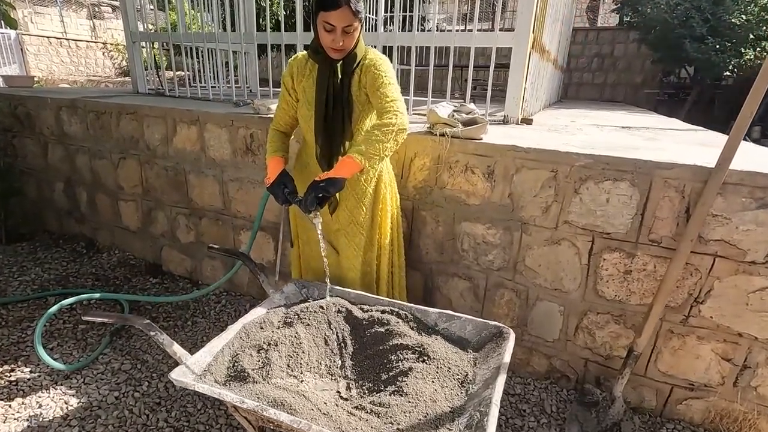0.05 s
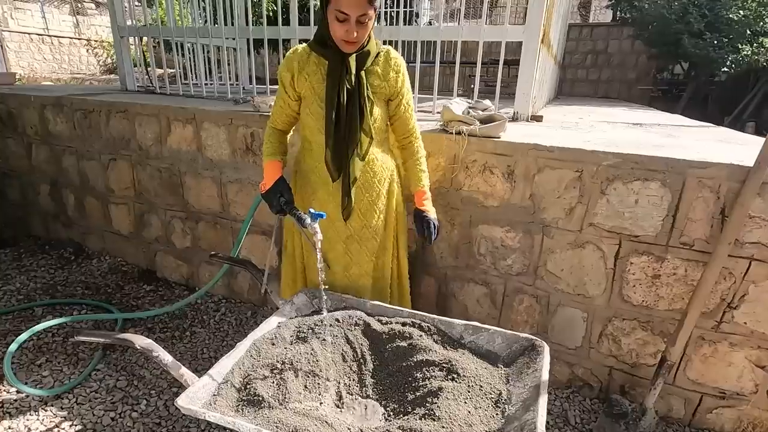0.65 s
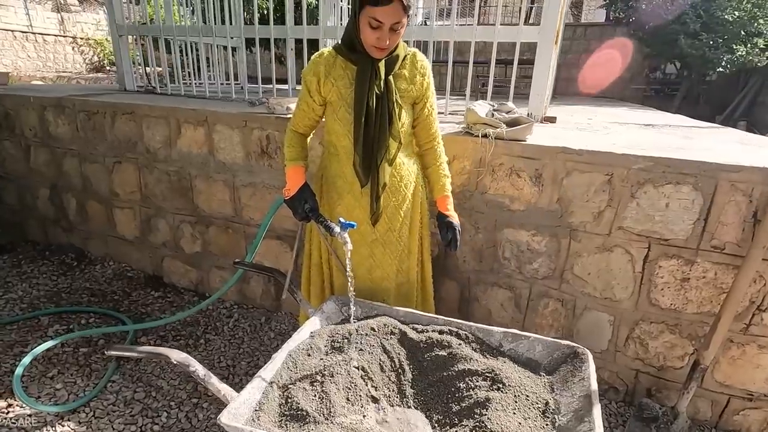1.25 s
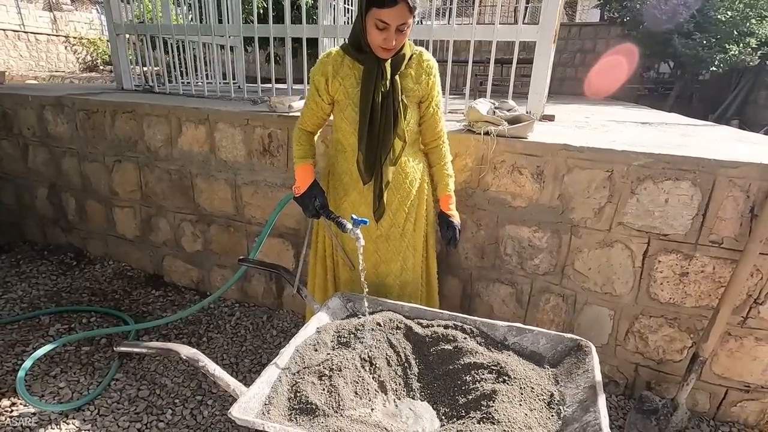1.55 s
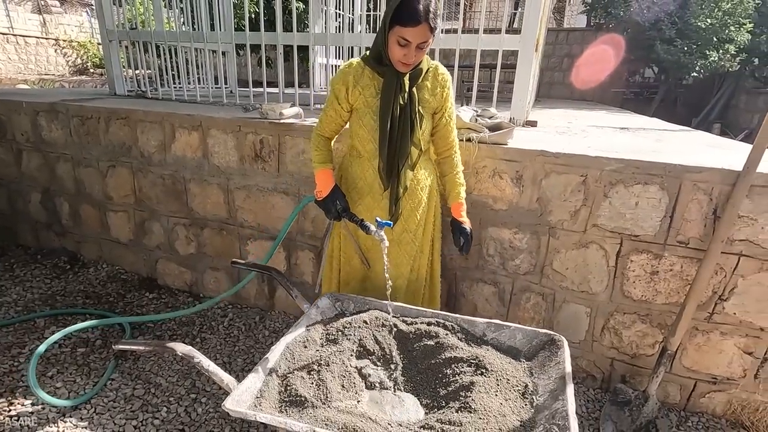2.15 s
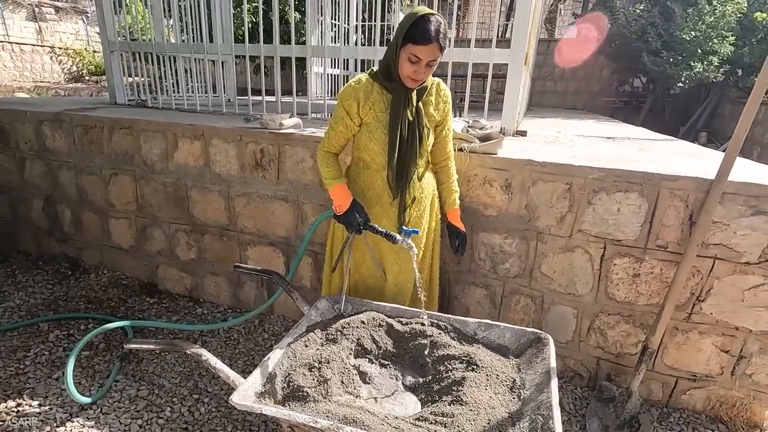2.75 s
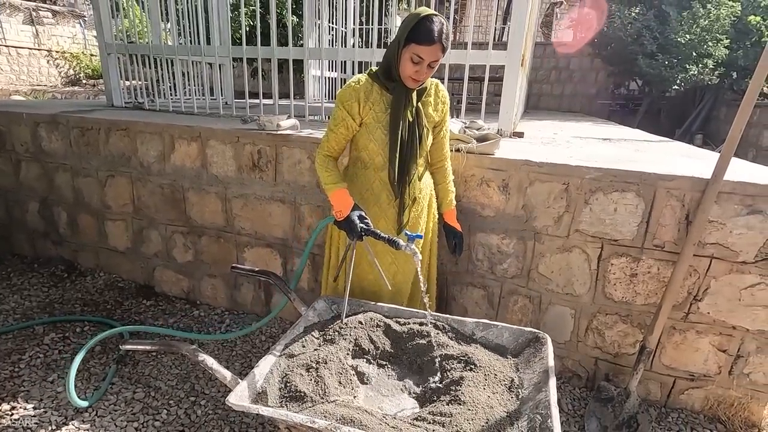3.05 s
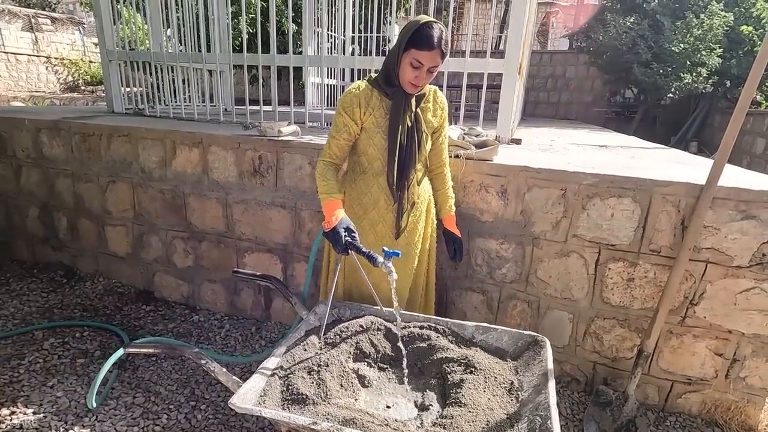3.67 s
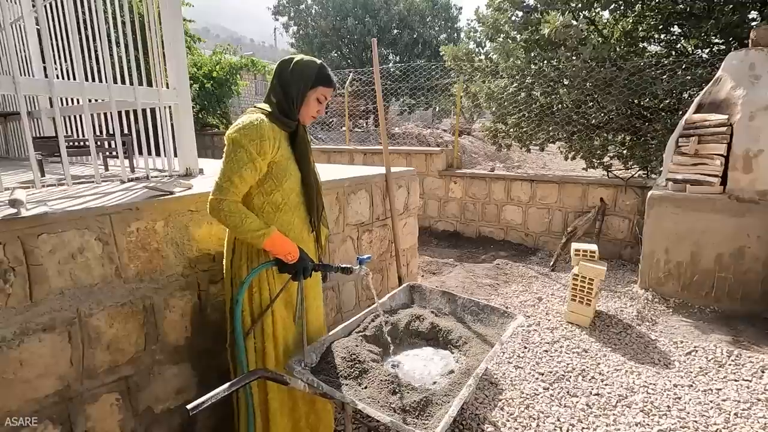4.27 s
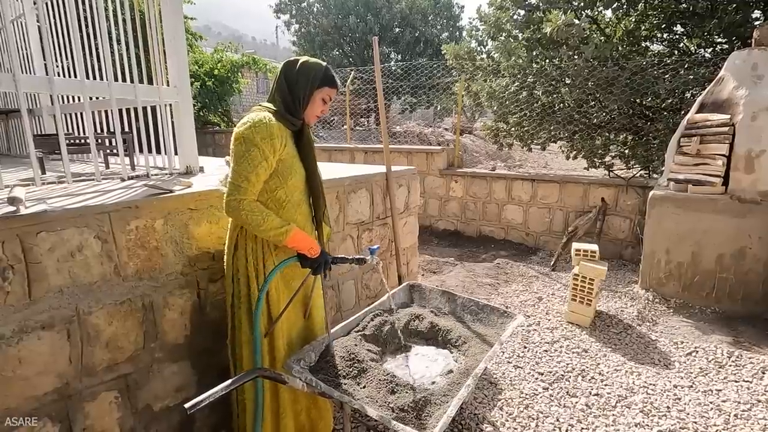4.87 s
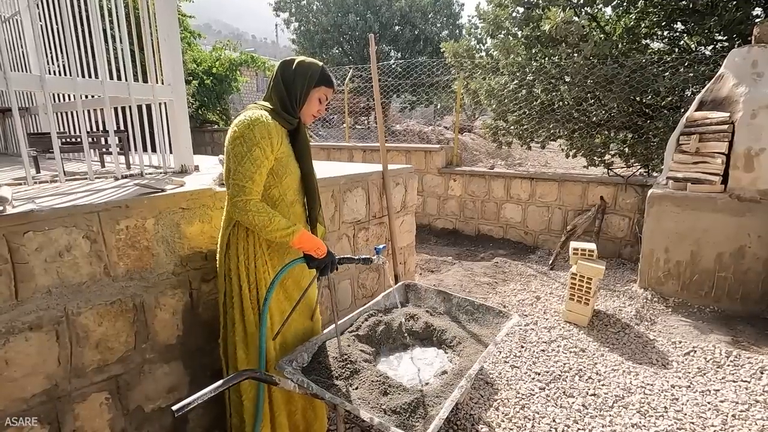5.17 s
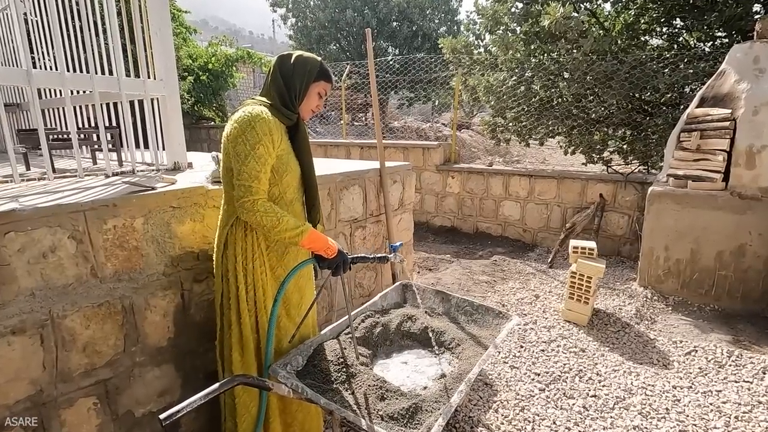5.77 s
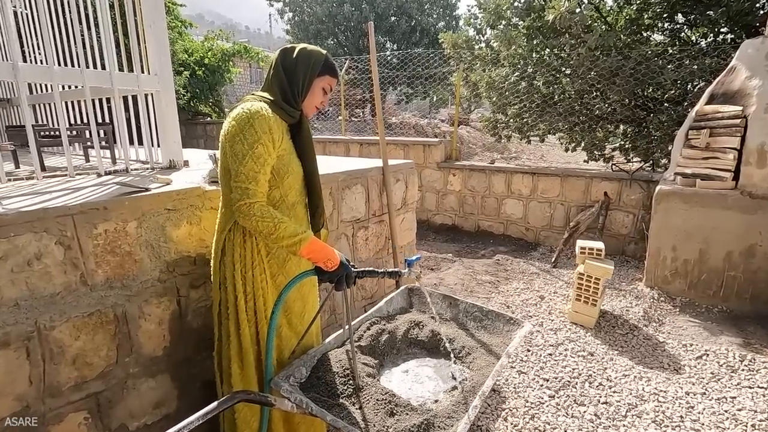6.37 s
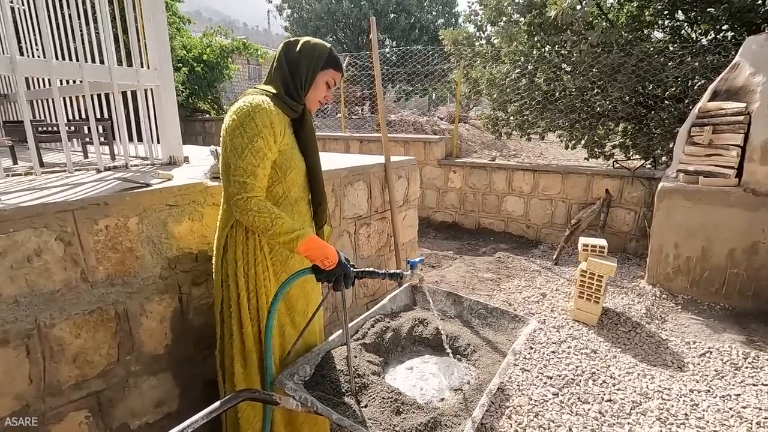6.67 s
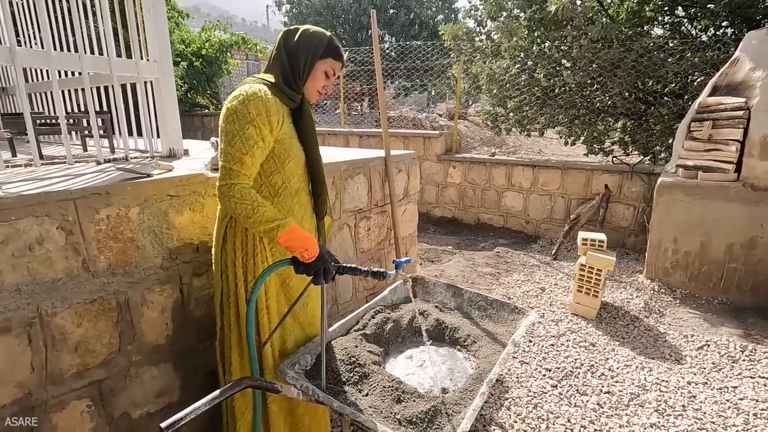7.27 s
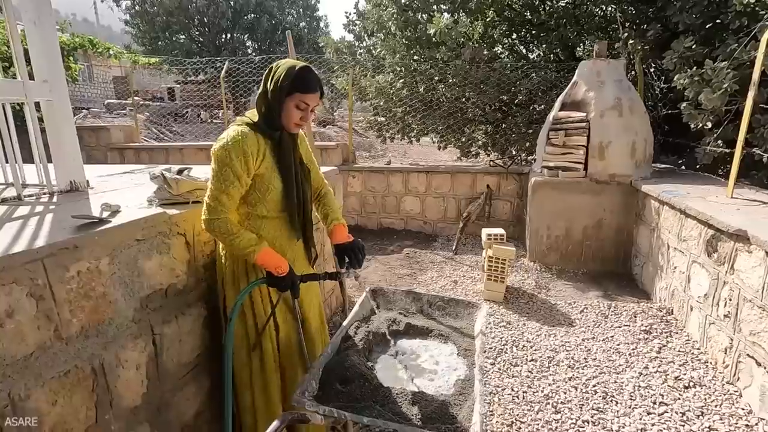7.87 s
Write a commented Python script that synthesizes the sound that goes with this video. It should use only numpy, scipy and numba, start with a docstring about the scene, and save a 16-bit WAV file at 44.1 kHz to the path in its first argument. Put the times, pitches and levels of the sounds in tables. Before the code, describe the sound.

A hose pours water spattering onto wet sand and cement in a steel wheelbarrow outdoors, while a small bird chirps.

```python
"""Hosing down sand and cement

A garden hose pours into a steel wheelbarrow in a stone-walled yard. The jet breaks into drops that
spatter on the wet heap, slop in the puddle and drum on the tray. A small bird chirps and a breeze
touches the microphone. We listen from three spots in turn (front, side, end), switching suddenly."""
import sys
import numpy as np
from scipy import signal
from scipy.fft import rfft, irfft
from scipy.io import wavfile
from scipy.ndimage import uniform_filter1d, map_coordinates
from numba import njit

SR = 44100
rng = np.random.default_rng(int(sys.argv[2]) if len(sys.argv) > 2 else 0)


def unload_audio(sound):
    """Save the sound as a 16-bit wav file, at the path given as the first command line argument."""
    columns = np.transpose(np.atleast_2d(sound))
    # keep every value between -1 and 1, then stretch to whole-number steps
    steps = np.round(np.clip(columns, -1, 1) * 32767)
    wavfile.write(sys.argv[1], SR, steps.astype(np.int16))


N = 358091
TIME = np.arange(N) / SR
MOVE_S, PAUSE_S, RESUME_S = 4.165, 7.83, 7.885  # side spot starts, short silence, end spot starts

# The pour at each spot as the jet wanders over heap and puddle: t/s, spray level/dB, splash level/dB
FLOW_FRONT = [(0, -46.5, -54.5), (.2, -47.5, -49.5), (.4, -47, -52), (.5, -46, -44.5), (.56, -43, -50.5),
              (.63, -46, -50.5), (.77, -46, -54), (.95, -44.5, -45.5), (1.25, -49, -50.5),
              (1.42, -51.5, -49.5), (1.7, -48, -50), (1.87, -46.5, -47.5), (1.98, -47.5, -48),
              (2.0, -45.5, -48.5), (2.05, -50.5, -51), (2.18, -49, -55), (2.5, -49.5, -56.5),
              (2.65, -49, -56.5), (3.05, -50.5, -59), (3.26, -49, -52), (3.54, -51.5, -60),
              (3.72, -48, -54.5), (3.92, -49.5, -54.5), (4.1, -49, -55), (4.16, -56, -56.5)]
FLOW_SIDE = [(4.2, -80.5, -65.5), (4.5, -75, -62), (4.85, -68.5, -65), (4.99, -65, -59.5), (5.07, -64, -52),
             (5.15, -61, -56.5), (5.21, -63.5, -50.5), (5.29, -60.5, -56), (5.38, -65.5, -56.5),
             (5.58, -61, -59.5), (5.7, -60.5, -49), (5.85, -57, -54), (6.1, -56.5, -52), (6.25, -59, -56.5),
             (6.45, -56, -51.5), (6.8, -59, -58.5), (6.97, -55, -60), (7.1, -51.5, -52),
             (7.35, -53.5, -52.5), (7.58, -51.5, -49.5), (7.8, -53.5, -53.5)]
FLOW_END = [(7.88, -93, -77), (7.92, -73, -63), (7.96, -64.5, -54.5), (8.0, -59, -57.5),
            (8.07, -57.5, -52.5), (8.12, -61, -49.5)]
# Tone of the spatter on the heap at each spot: f/Hz, level/dB
HEAP_TONE_FRONT = [(400, -15.5), (800, -18), (1400, -10.5), (1800, -7), (2300, -1.5), (2900, -1), (4200, 4),
                   (5200, 1), (7400, 2.5), (8500, -2), (10000, -9.5), (11000, -16), (12200, -14.5),
                   (15500, -31.5)]
HEAP_TONE_SIDE = [(400, -45), (900, -22), (1350, -3), (1750, -4.5), (2300, 0), (2900, -0.5), (3600, -1),
                  (4400, -0.5), (6200, -6), (7300, -8), (8200, -17), (9200, -16.5), (10500, -23.5),
                  (12200, -24), (15500, -32)]
HEAP_TONE_END = [(300, 1.5), (1000, -11), (1400, -7), (2200, 3.5), (3600, -6.5), (4400, -12.5),
                 (6400, -18.5), (8500, -40), (11000, -53), (14000, -83)]
# Tone of the puddle's bubbles (the end spot shares the side's): f/Hz, level/dB
PUDDLE_TONE_FRONT = [(250, -29), (400, -12), (560, -6.5), (700, 1), (811, -0.5), (870, -4), (960, 1),
                     (1080, -3), (1400, -0.5), (1900, -9), (3000, -30)]
PUDDLE_TONE_SIDE = [(250, -23), (400, -13), (540, -4.5), (680, 1.5), (800, 0), (900, -6.5), (1080, -1.5),
                    (1400, -7), (1900, -7), (3000, -14)]
# Tone of the drumming tray, the breeze and the open air: f/Hz, level/dB
DRUM_TONE = [(60, -37), (120, -10.5), (155, 1.5), (195, 3.5), (250, -0.5), (310, -3), (420, -8.5),
             (700, -14)]
BREEZE_TONE = [(8, 4), (20, 8), (35, -4), (52, -7.5), (75, -22), (120, -35.5), (300, -49.5)]
AIR_TONE = [(40, 0), (85, 4.5), (120, -1), (190, 4.5), (400, -4), (560, -3), (900, -10.5), (1500, -20),
            (2900, -8), (5000, -20), (8500, -23), (14000, -39)]
# Notes at which the steel tray and its hollow ring: f/Hz, width/Hz, level/dB
TRAY_NOTES = [(531, 80, 5), (1050, 190, 5), (2030, 47, -4), (2535, 29, 5), (2867, 290, 1), (3480, 34, -6.5)]
# Two-note chirps: t/s, then the high note's length/s, f/Hz, level/dB, then the low note's f/Hz, level/dB
BIRD_CHIRPS = [(-.07, 0.1, 4420, -65, 3750, -48), (.18, 0.068, 4400, -45, 3620, -41),
               (1.054, 0.069, 5120, -42, 3710, -43), (1.234, 0.084, 4460, -55, 3740, -54),
               (2.235, 0.072, 4350, -41, 3600, -43.5), (2.376, .048, 4200, -42.5, 3330, -49),
               (3.165, 0.09, 5060, -43, 3750, -43), (3.79, .089, 4250, -52, 3540, -45.5),
               (3.984, 0.072, 4650, -44.5, 3660, -40), (5.981, .08, 4160, -50, 3450, -44.5),
               (6.32, 0.066, 5050, -50.5, 3640, -47.5), (7.134, 0.075, 4450, -50, 3520, -43.5),
               (7.49, 0.093, 4410, -51.5, 3740, -50)]
# Gusts on the microphone: peak t/s, half-length/s, level/dB
WIND_GUSTS = [(0.278, 0.064, -41.5), (0.743, 0.072, -41), (1.197, 0.043, -45), (1.5, 0.24, -58.5),
              (2.796, 0.076, -40.5), (3.05, 0.12, -39), (3.49, 0.37, -50), (4.77, 0.032, -53),
              (6.0, 0.91, -59.5), (7.298, 0.99, -62.5), (8.1, 0.096, -51)]
# The biggest drops hitting wet cement: t/s, level/dB, f/Hz
BIG_DROPS = [(.018, -32, 3380), (0.067, -25, 3640), (0.1336, -18, 6830), (0.1554, -26.5, 3620),
             (0.278, -24, 3540), (0.3587, -20.5, 3630), (0.4108, -23, 2940), (0.428, -23.5, 3900),
             (.457, -34, 2900), (0.5262, -21, 6090), (0.5671, -21, 3170), (0.7196, -25, 4000),
             (0.8026, -16.5, 4370), (0.8629, -18.5, 4180), (0.93, -17, 5100), (1.0067, -24, 7060),
             (1.2858, -28.5, 3520), (1.565, -24.5, 5600), (1.9282, -24, 3650), (1.947, -27.5, 2400),
             (1.957, -26.5, 2880), (1.9857, -18, 4150), (2.1487, -21.5, 5930), (2.367, -26, 5600),
             (2.4468, -35, 2800), (2.484, -30.5, 3680), (2.7916, -18, 6200), (2.9053, -26, 3650),
             (3.017, -26, 3400), (3.111, -25.5, 7040), (3.1512, -24, 8100), (3.233, -24, 3320),
             (3.2662, -28.5, 3280), (3.414, -26.5, 7200), (3.57, -32, 4870), (3.593, -19.5, 7550),
             (3.7335, -18, 4700), (4.458, -41, 2750), (4.616, -39, 2900), (4.65, -46, 2930),
             (4.916, -42, 2870), (4.968, -38, 2930), (5.034, -34, 3350), (5.1096, -37, 4500),
             (5.161, -35.5, 3500), (5.1684, -33, 3500), (5.353, -38, 2960), (5.4388, -40, 3140),
             (5.539, -45, 3500), (5.671, -29.5, 2900), (5.829, -30.5, 3120), (5.91, -31, 2680),
             (5.9516, -29, 3040), (6.0204, -20.5, 3060), (6.0798, -31, 2870), (6.166, -34, 2540),
             (6.2876, -35, 2620), (6.84, -40, 3760), (6.9876, -28.5, 3070), (7.0543, -28.5, 2650),
             (7.108, -33, 2520), (7.145, -30, 2660), (7.1604, -27.5, 4250), (7.407, -28, 2800),
             (7.428, -33, 2540), (7.4602, -26.5, 2900), (7.526, -22, 2440), (7.699, -36, 2790),
             (7.8139, -29.5, 2370), (7.8216, -26.5, 3030), (7.9683, -31, 2030), (7.998, -24, 2720),
             (8.0844, -21, 2540), (8.107, -24, 3000)]
# The biggest air pockets popping in the wet mix: t/s, level/dB, f/Hz
AIR_POCKETS = [(.031, -36, 1030), (.2015, -27, 1120), (.444, -31, 1230), (.446, -28, 2050),
               (.936, -31, 1050), (.955, -30.5, 1010), (.993, -33.5, 1120), (1.02, -33, 990),
               (1.076, -30, 1070), (1.422, -38, 945), (4.734, -41.5, 1420), (5.065, -42, 2400),
               (5.132, -37, 2680), (5.207, -38, 2640), (5.33, -45, 1450), (5.747, -38.5, 1260),
               (5.772, -40, 1020), (5.788, -39.5, 760), (5.964, -36.5, 577), (6.032, -38, 2050),
               (6.06, -41, 560), (6.2615, -43, 1310), (6.403, -40, 1700), (7.055, -29.5, 1380),
               (7.146, -38, 2540), (7.228, -41, 1350), (7.247, -35.5, 1200), (7.526, -40, 2400),
               (7.529, -40, 1390), (7.39, -40, 1270), (7.683, -40, 1150), (7.813, -39, 1300),
               (7.968, -23, 2200), (8.025, -32, 1860), (8.087, -33, 1500), (8.113, -28, 1690)]
# Short bursts flung over the heap: t/s, length/s, extra spray level/dB, extra splash level/dB
JET_SPUTTERS = [(0.129, 0.0091, 10, 13), (0.797, 0.043, 6, 8.5), (0.864, 0.018, -1.5, -3),
                (.93, 0.028, 3.5, -1), (1.004, 0.025, 6, -1), (2.294, 0.011, 8, 5), (2.442, 0.019, 8.5, 1),
                (2.542, 0.0091, -1, 14.5), (3.604, 0.017, 12, 9), (3.73, 0.012, -1, -6),
                (4.606, 0.038, 7, -10), (4.748, .012, 7, -6), (4.79, 0.014, 12, 4), (5.526, 0.035, 6, 0),
                (6.844, 0.022, 3.5, -6), (7.155, 0.01, -3, -16), (7.289, 0.01, 5, -9)]
# The jet digging into the puddle: t/s, length/s, slop level/dB, drumming level/dB
PUDDLE_GURGLES = [(0.17, 0.1, -58, -57), (0.286, 0.11, -58.5, -56), (0.416, 0.15, -51.5, -60),
                  (0.549, 0.061, -60, -50.5), (0.797, 0.34, -53, -68), (1.814, 0.034, -51.5, -53),
                  (2.07, 0.053, -55.5, -78), (2.284, 0.12, -61.5, -82), (3.01, 0.034, -57, -61),
                  (4.716, 0.11, -68.5, -72), (4.842, 0.09, -73, -67), (5.07, 0.306, -67.5, -88),
                  (5.674, 0.13, -65, -66.5), (5.822, 0.29, -56, -66.5), (6.136, 0.12, -75, -63),
                  (7.237, 0.066, -52, -64), (7.665, 0.089, -57.5, -75)]
# Dull knocks: t/s, level/dB, f/Hz
DULL_KNOCKS = [(.557, -39, 232), (1.074, -43, 307), (1.821, -36.5, 237), (3.02, -47, 152),
               (4.754, -49, 131), (4.875, -49.5, 86), (7.962, -33.5, 325)]


def undb(db):
    """Turn decibels into a number to multiply by."""
    return 10 ** (np.asarray(db) / 20)


def unit(x):
    """Scale a sound to an average power of 1."""
    return x / np.sqrt(np.mean(x ** 2))


def band(x, lo_hz, hi_hz, order=2):
    """Keep the sound between two frequencies."""
    return signal.sosfilt(signal.butter(order, [lo_hz, hi_hz], "band", fs=SR, output="sos"), x)


def colour(x, tone, size=8192):
    """Shape a sound with a tone table, keeping its attacks sharp."""
    hz, db = np.transpose(tone)
    grid = np.maximum(np.arange(size // 2 + 1) * SR / size, 1)
    cepstrum = irfft(np.log(undb(np.interp(np.log(grid), np.log(hz), db))))
    # Fold the filter so that it never rings before a hit.
    cepstrum[1:size // 2] *= 2
    cepstrum[size // 2 + 1:] = 0
    return signal.fftconvolve(x, irfft(np.exp(rfft(cepstrum))))[:len(x)]


def wander(rate):
    """A random curve that heads for a new value `rate` times a second."""
    return np.interp(TIME * rate, np.arange(N), rng.standard_normal(N))


def steady(x, lo_hz, hi_hz, size=5000):
    """Even out a sound so that its power in one band stays near 1."""
    power = uniform_filter1d(band(x, lo_hz, hi_hz, order=4) ** 2, size)
    return x / np.sqrt(uniform_filter1d(power, size // 2) + 1e-18)


def between(start, end, ramp_s=.006):
    """1 from start to end and 0 outside, with short ramps."""
    return np.clip(np.minimum(TIME - start, end - TIME) / ramp_s + .5, 0, 1)


def swell(centre_s, half_s):
    """A smooth rise to 1 and fall."""
    return np.exp(-np.minimum(((TIME - centre_s) / half_s) ** 2, 50))


def echoes(x, t60, wet_db, delay_s):
    """The sound plus left and right echoes that fade by 60 dB in t60 seconds."""
    t = TIME[:SR // 2]
    tail = rng.standard_normal((2, len(t))) * undb(-60 * t / t60) * (t > delay_s)
    tail *= undb(wet_db) / np.sqrt(np.sum(tail ** 2, axis=1, keepdims=True))
    return x + signal.fftconvolve(np.atleast_2d(x), tail, axes=1)[:, :N]


@njit
def ring(times, hz, cycles, size, glide):
    """Tones that fade by 60 dB in so many cycles; a glide of 0.1 lifts their pitch by a tenth."""
    out = np.zeros(N)
    for k in range(len(times)):
        start, length = int(times[k] * SR), int(cycles[k] * SR / hz[k]) + 2
        phase = 0.
        for i in range(min(length, N - start)):
            phase += 2 * np.pi * hz[k] * (1 + glide * i / length) / SR
            out[start + i] += size[k] * np.exp(-6.9 * i / length) * np.sin(phase)
    return out


def arrivals(rate, spread_db, fade_s, trickle):
    """Loudness that jumps and fades as lumps of water land at random, over a steady trickle."""
    chance, weight = rng.random((2, N))
    lumps = (chance < rate / SR) * undb(-spread_db * np.log(weight + .1))
    power = signal.lfilter([1], [1, -np.exp(-1 / (fade_s * SR))], lumps ** 2)
    return np.sqrt(power / np.mean(power) + trickle)


def drops(rate, lo_hz, hi_hz, cycles, spread_db, glide):
    """A shower of `rate` briefly ringing drops a second, many small and a few large."""
    shower_rng = np.random.default_rng(rng.integers(1 << 30))
    when, pitch, life, weight = shower_rng.random((int(rate * N / SR), 4)).T
    hz = lo_hz * (hi_hz / lo_hz) ** pitch
    lives = cycles * 2 ** (2 * life - 1)
    size = undb(-spread_db * np.log(weight + .015)) * hz / np.sqrt(lives)  # even energy per Hz
    return unit(ring(when * N / SR, hz, lives, size, glide))


def pour(flow, heap, puddle, drop_rate, spread_db, lump_rate, lump_db, trickle, hiss_db,
         plink_db, plink_hz, ring_db, patter_db, slop_db, drum_db, wobble_db):
    """The jet lands in lumps that throw fine spray and splashes, stir bubbles and shake the tray."""
    falter_db = -8 * swell(centre_s=.11, half_s=.026)  # one dip as the tap is turned
    flow_db = falter_db + wobble_db * wander(24)
    times, *levels = np.transpose(flow)
    spray_db, splash_db = (np.interp(TIME, times, db) + flow_db for db in levels)
    extra_spray_db, extra_splash_db = sputters()
    lumps = arrivals(lump_rate, lump_db, fade_s=.0021, trickle=trickle)
    patter = drops(drop_rate, 1064, 14760, cycles=24., spread_db=spread_db, glide=.37)
    # Small bubbles ring in clusters at the edge of the puddle.
    clusters = arrivals(rate=60, spread_db=1.2, fade_s=.013, trickle=.27)
    plinks = undb(plink_db) * drops(650, *plink_hz, cycles=48, spread_db=3.8, glide=.029) * clusters
    hiss = undb(hiss_db) * rng.standard_normal(N)
    patter = colour((patter + hiss) * lumps + plinks, heap)
    patter += undb(ring_db) * tray_ring(patter)
    # The lower part of the patter is the splash; the rest is the spray.
    coarse = signal.sosfiltfilt(signal.butter(2, 4000, fs=SR, output="sos"), patter)
    splash = steady(coarse, 1600, 3000) * undb(splash_db + extra_splash_db + patter_db)
    spray = steady(patter - coarse, 5200, 12000) * undb(spray_db + extra_spray_db + patter_db)
    # Slop follows the splash and drumming follows the spray; both swell in each gurgle.
    gurgle_slop, gurgle_drum = gurgles()
    bubbles = colour(drops(700, 340, 2030, cycles=13.2, spread_db=6., glide=.25), puddle)
    bubbles += undb(ring_db) * tray_ring(bubbles)
    slop = steady(bubbles, 450, 2150) * np.hypot(undb(splash_db + slop_db), gurgle_slop)
    thuds = colour(drops(500, 64., 630, cycles=10.6, spread_db=2.5, glide=0.), DRUM_TONE)
    drum = steady(thuds, 114, 400) * np.hypot(undb(spray_db + drum_db), gurgle_drum)
    return splash + spray + slop + drum


def tray_ring(x):
    """The steel tray rings at its own notes when water hits it."""
    return sum(undb(db) * signal.lfilter(*signal.iirpeak(hz, hz / width, fs=SR), x)
               for hz, width, db in TRAY_NOTES)


def bird(rasp=.0734, flutter_db=2.5, gain_db=1.5, fall_per_s=1.55, low_s=.07):
    """Hoarse chirps of two falling notes, high then low, echo between the stone walls."""
    song = np.zeros(N)
    waver = rasp * wander(1000)  # a fast shake in pitch makes the voice hoarse
    flutter = unit(undb(flutter_db * wander(250)))
    for s, high_s, high_hz, high_db, low_hz, low_db in BIRD_CHIRPS:
        high = s, high_s, high_hz, high_hz * (1 - fall_per_s * high_s), high_db
        low = s + .63 * high_s, low_s, low_hz, low_hz * .83, low_db
        for start, length, first_hz, last_hz, db in (high, low):
            span = (TIME > start) & (TIME < start + length)
            progress = np.clip((TIME[span] - start) / length, 0, 1)
            hz = (last_hz + (first_hz - last_hz) * (1 - progress) ** 1.09) * (1 + waver[span])
            arch = 2 * np.sqrt(progress * (1 - progress))
            song[span] += undb(db + gain_db) * arch * np.sin(2 * np.pi * np.cumsum(hz) / SR)
    spots = between(-1, MOVE_S), between(MOVE_S, PAUSE_S)
    return sum(echoes(song * flutter * here, t60=.36, wet_db=2.5, delay_s=.004) for here in spots)


def breeze(left_db=-3, right_db=-11, own_db=3, front_db=-55, later_db=-65.5):
    """Swirls of air rumble on the microphone, more on the left; gusts swell over the steady wind."""
    shared, left, right = (steady(colour(rng.standard_normal(N), BREEZE_TONE), 15, 70) for _ in range(3))
    rumble = np.array([undb(left_db) * (shared + undb(own_db) * left),
                       undb(right_db) * (shared + undb(own_db) * right)])
    wind = undb(np.where(TIME < MOVE_S, front_db, later_db))
    gusts = sum(undb(db) * swell(s, half_s) for s, half_s, db in WIND_GUSTS)
    return rumble * np.hypot(wind, gusts)


def open_air(level_db=-73, side_db=-7):
    """The faint wash of the open air."""
    mid, side = (unit(colour(rng.standard_normal(N), AIR_TONE)) for _ in range(2))
    return undb(level_db) * (mid + undb(side_db) * np.array([side, -side]))


def smacks(gain_db=1, burst_db=-14, burst_s=.0016, scatter_db=-27, scatter_s=.013):
    """A big drop cracks on the heap, bursts and throws droplets around."""
    out, t = np.zeros(N), TIME[:SR // 12]
    fade = undb(burst_db) * np.exp(-t / burst_s) + undb(scatter_db) * np.exp(-t / scatter_s)
    for start, db, hz in BIG_DROPS:
        crack = np.sin(2 * np.pi * hz * t) * np.exp(-t * hz / 2)
        droplets = unit(band(rng.standard_normal(len(t)), hz * .6, hz * 1.7)) * fade
        smack = band(crack + droplets, hz * .45, min(hz * 2.2, 8800), order=3)  # wet sand softens it
        i = int((start + .001) * SR)
        out[i:i + len(t)] += undb(db + gain_db) * smack[:N - i]
    return out


def pops(table, cycles, glide, gain_db, after_s, after_db, band_ratio=1.96):
    """A hollow rings, and three smaller neighbours follow at nearby pitches."""
    out, lives = np.zeros(N), np.full(4, float(cycles))
    for start, db, hz in table:
        lag, detune = rng.random((2, 3))
        pitches = hz * 2 ** np.r_[0, .7 * (detune - .5)]
        sizes = undb(db + gain_db + np.r_[0, np.full(3, after_db)])
        pop = ring(np.r_[0, after_s * lag], pitches, lives, sizes, glide)[:SR // 3]
        i = int(start * SR)
        out[i:i + len(pop)] += band(pop, hz / band_ratio, hz * band_ratio, order=1)[:N - i]
    return out


def sputters():
    """The jet sputters: spray and splash jump by some dB, then settle back."""
    spray, splash = np.zeros(N), np.zeros(N)
    for start, length, spray_db, splash_db in JET_SPUTTERS:
        shape = (TIME > start) * swell(start, length)
        spray += spray_db * shape
        splash += splash_db * shape
    return spray, splash


def gurgles(slop_gain_db=-2.5, drum_gain_db=1):
    """The jet digs into the puddle: slop and drumming build up, hold and die away."""
    slop, drum = np.zeros(N), np.zeros(N)
    for start, length, slop_db, drum_db in PUDDLE_GURGLES:
        shape = between(start, start + length, ramp_s=.016)
        slop += undb(slop_db + slop_gain_db) * shape
        drum += undb(drum_db + drum_gain_db) * shape
    return slop, drum


def shifting_echoes(x, t60, wet_db, delay_s, count=4):
    """Echoes whose paths keep changing as the jet wanders over the heap."""
    weights = np.array([wander(7) for _ in range(count)])
    weights /= np.sqrt(np.sum(weights ** 2, axis=0))
    return x + sum(w * (echoes(x, t60, wet_db, delay_s) - x) for w in weights)


def microphone(x, lag_samples=.15, left_db=.5, shimmer_db=-1.5):
    """The top treble reaches each side by its own paths; at the front spot the left hears a bit late."""
    left = map_coordinates(x[0], [np.arange(N) - lag_samples * (TIME < MOVE_S)], order=3)
    top = band(x.mean(axis=0), 10500, 18000, order=4)
    shimmer = echoes(top, t60=.0069, wet_db=shimmer_db, delay_s=0)[0] - top
    return np.array([left * undb(left_db) + shimmer, x[1] - shimmer])


def stereo_width(narrowest=.0035, hold_s=1.25, widen_s=1.93):
    """The sound snaps to the centre at each change of spot; at the side spot it slowly widens again."""
    since = TIME - np.where(TIME < PAUSE_S, MOVE_S, PAUSE_S)
    return np.where(TIME < MOVE_S, 1, np.clip((since - hold_s) / widen_s, narrowest, 1))


def scene():
    """The pour from three spots, with the yard's echoes, the bird and the breeze."""
    front = pour(FLOW_FRONT, HEAP_TONE_FRONT, PUDDLE_TONE_FRONT, drop_rate=5000, spread_db=4,
                 lump_rate=440, lump_db=4, trickle=.47, hiss_db=-5, plink_db=-23, plink_hz=(1766, 4680),
                 ring_db=-12.5, patter_db=-.5, slop_db=-18.5, drum_db=-18.5, wobble_db=1)
    side = pour(FLOW_SIDE, HEAP_TONE_SIDE, PUDDLE_TONE_SIDE, drop_rate=1700, spread_db=3.5,
                lump_rate=150, lump_db=3, trickle=.79, hiss_db=1, plink_db=-4.5, plink_hz=(1403, 4070),
                ring_db=-1, patter_db=-2, slop_db=-15.5, drum_db=-12.5, wobble_db=1.5)
    end = pour(FLOW_END, HEAP_TONE_END, PUDDLE_TONE_SIDE, drop_rate=2700, spread_db=3.5,
               lump_rate=200, lump_db=4, trickle=.44, hiss_db=2.5, plink_db=-3, plink_hz=(1180, 4260),
               ring_db=-28, patter_db=3.5, slop_db=1, drum_db=-7, wobble_db=-.5)
    at_side = between(MOVE_S, PAUSE_S)
    water = front * between(-1, MOVE_S) + side * at_side + end * (TIME > RESUME_S)
    hits = smacks()
    water += hits + undb(-5.5) * tray_ring(hits * at_side)  # from the side, smacks ring the tray
    plops = pops(AIR_POCKETS, cycles=15, glide=.096, gain_db=1.5, after_s=.011, after_db=-8)
    knocks = pops(DULL_KNOCKS, cycles=20, glide=0., gain_db=-6.5, after_s=.0253, after_db=-7.5)
    water += band(plops, 740, 5700) + band(knocks, 48, 1200)
    in_yard = shifting_echoes(water, t60=.075, wet_db=-6.5, delay_s=.0015)
    mix = microphone(in_yard) + bird() + breeze() + open_air()
    left, right = mix * (1 - between(PAUSE_S, RESUME_S))
    spread = (left - right) / 2 * stereo_width()
    return (left + right) / 2 + np.array([spread, -spread])


def record(dry):
    """Cut away the treble above 15600 Hz."""
    return signal.sosfilt(signal.ellip(10, .2, 70, 15600, fs=SR, output="sos"), dry)


dry = scene()
out = record(dry)
unload_audio(out)
```